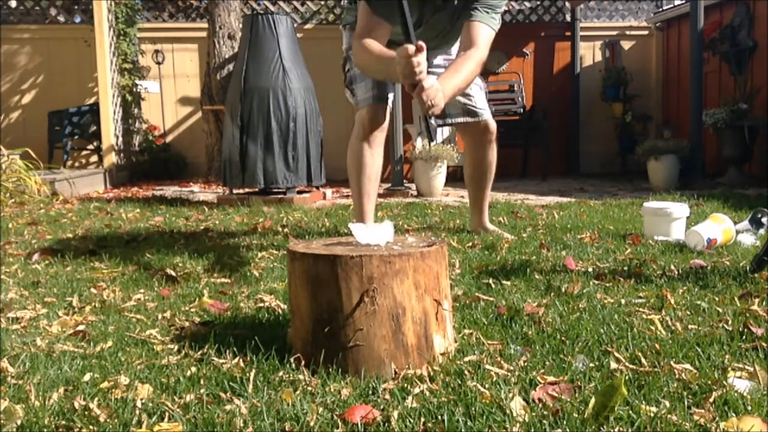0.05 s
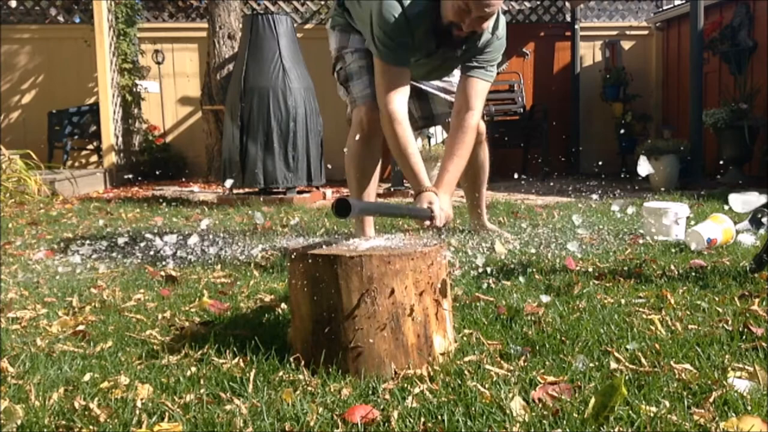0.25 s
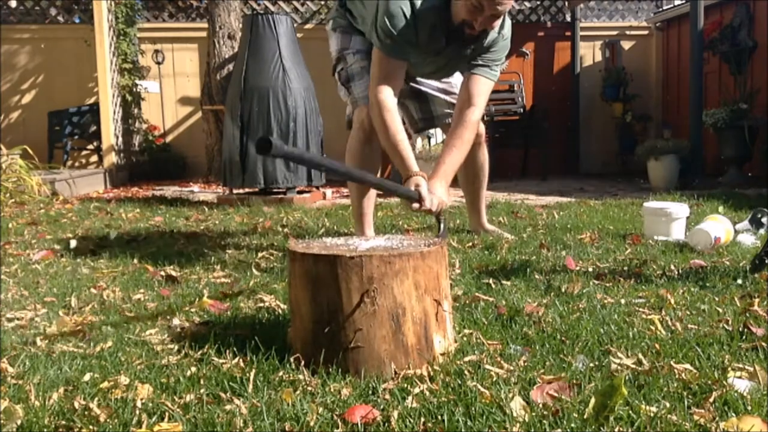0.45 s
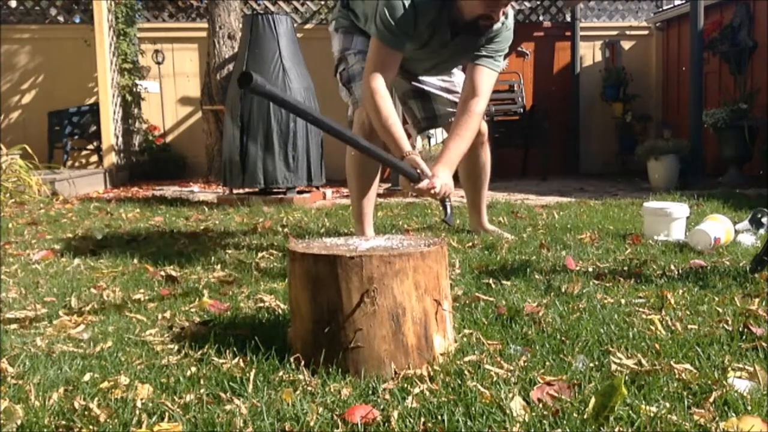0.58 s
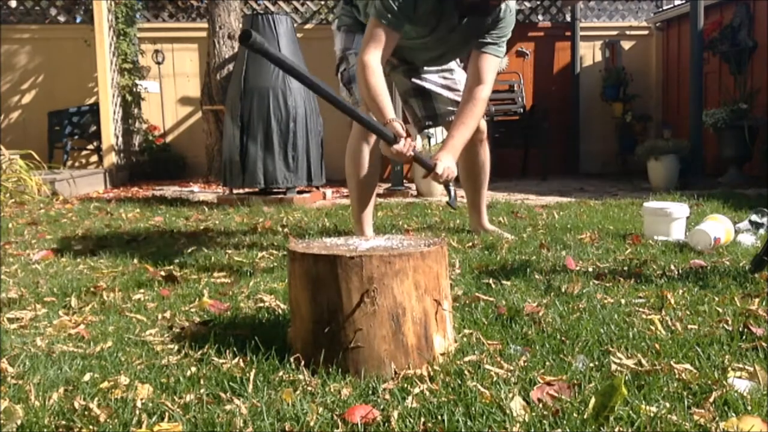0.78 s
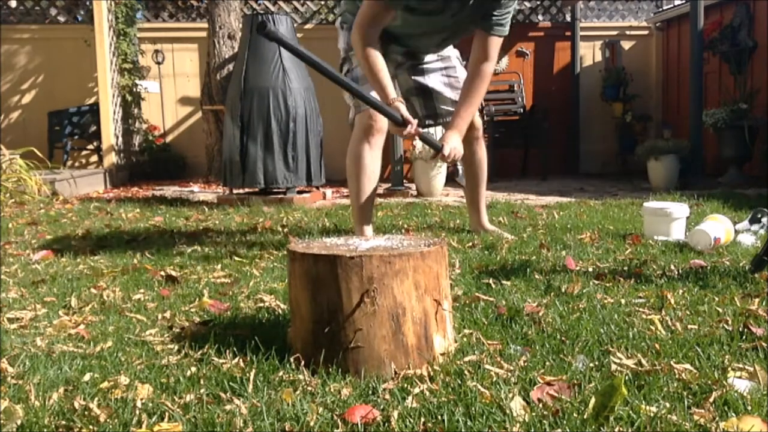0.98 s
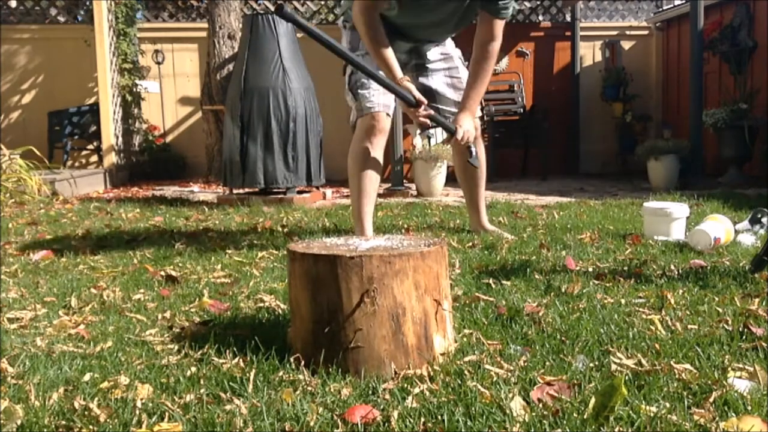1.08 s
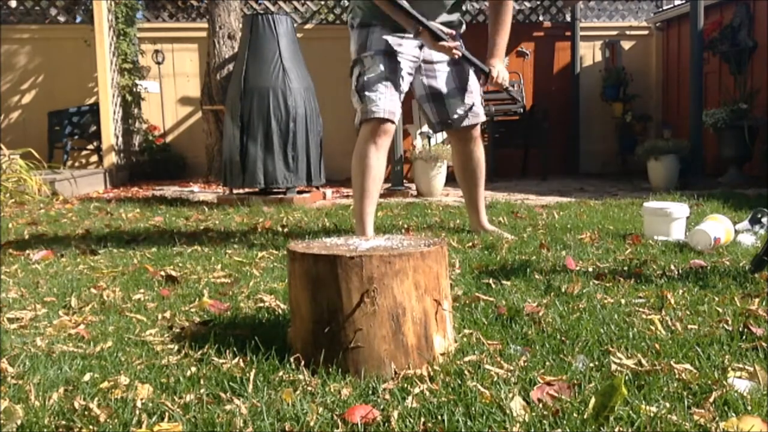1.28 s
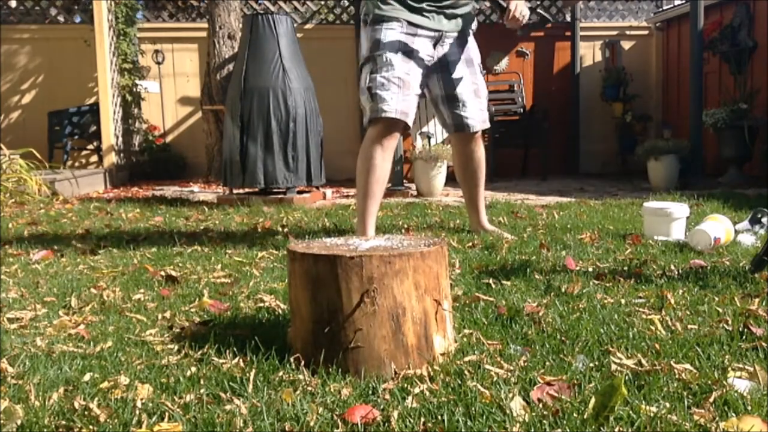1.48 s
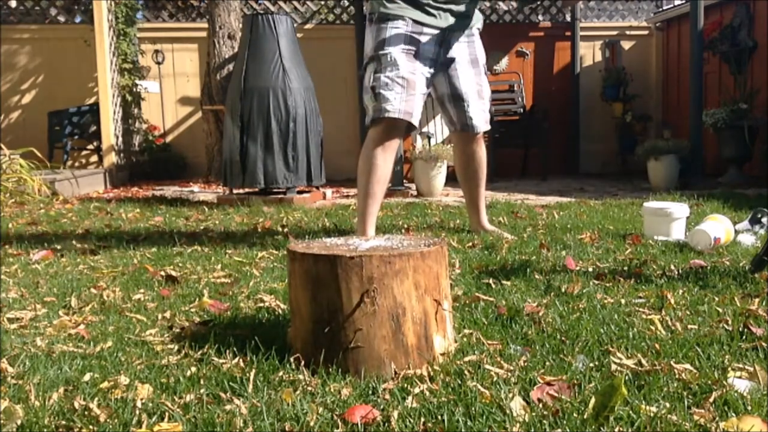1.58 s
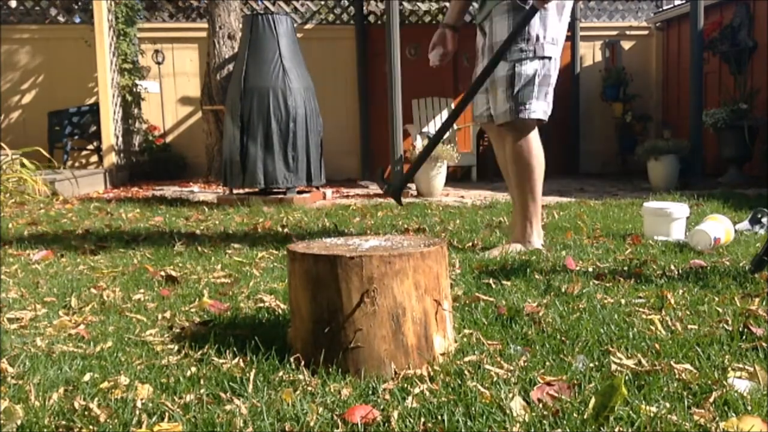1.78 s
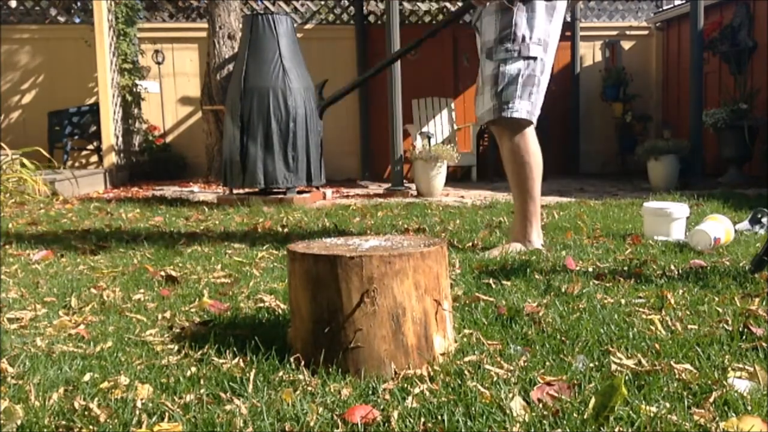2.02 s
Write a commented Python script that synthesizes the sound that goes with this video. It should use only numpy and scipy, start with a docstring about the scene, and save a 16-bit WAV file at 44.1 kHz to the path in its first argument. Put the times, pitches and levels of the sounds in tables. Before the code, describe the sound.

A piece of crockery shatters under a cane blow, followed by briefly clinking falling fragments.

```python
"""In a fenced backyard, a cane smashes a piece of crockery on a wooden stump.
Brittle fracture gives a few quick cracks over the thud of the stump's damped modes. A fifth of a second
later the shards land and vibrate freely, clinking and knocking on wood in a thinning shower of chips.
Fences and walls reflect the impacts. A distant engine drones, and a foot brushes the grass.
Near the end the sound drops out for a moment."""
import sys
import numpy as np
from scipy import signal
from scipy.fft import rfft, irfft
from scipy.io import wavfile
from scipy.ndimage import uniform_filter1d

SR = 44100
rng = np.random.default_rng(int(sys.argv[2]) if len(sys.argv) > 2 else 0)


def unload_audio(sound):
    """Save the sound as a 16-bit wav file, at the path given as the first command line argument."""
    columns = np.transpose(np.atleast_2d(sound))
    # keep every value between -1 and 1, then stretch to whole-number steps
    steps = np.round(np.clip(columns, -1, 1) * 32767)
    wavfile.write(sys.argv[1], SR, steps.astype(np.int16))


N = 90404
T = np.arange(N) / SR
LOG_FREQS = np.log(np.maximum(np.fft.rfftfreq(N, 1 / SR), 1))


def undb(db):
    """Amplitude ratio of a level in decibels."""
    return 10 ** (np.asarray(db) / 20)


def unit(x):
    """Normalisation to an rms of 1."""
    return x / np.sqrt(np.mean(x ** 2))


def curve(rows):
    """Amplitude envelope interpolated between (seconds, dB) points."""
    return undb(np.interp(T, *np.array(rows).T))


def colour(x, points):
    """Spectral shaping of x by (Hz, dB) points, at an rms of 1."""
    hz, db = np.array(points).T
    gain = undb(np.interp(LOG_FREQS, np.log(hz), db))
    return unit(irfft(rfft(x) * gain, N))


def noise(points):
    """Gaussian noise with a shaped spectrum."""
    return colour(rng.standard_normal(N), points)


def decay(start, t60):
    """Exponential damping: an instant onset, then a fall of 60 dB every t60 seconds."""
    return (T >= start) * np.exp(-np.log(1000) * np.maximum(T - start, 0) / t60)


def ring(start, modes, contact_s=.0005):
    """Modal superposition: damped sinusoids that build up over the contact time."""
    push = np.clip((T - start) / contact_s, 0, 1)
    return push * sum(undb(db) * decay(start, t60) * np.cos(2 * np.pi * hz * (T - start))
                      for hz, db, t60 in modes)


def drift(rate_hz):
    """Smoothed random fluctuation with an rms of 1."""
    hold = int(SR / rate_hz)
    steps = np.repeat(rng.standard_normal(N // hold + 1), hold)
    return unit(uniform_filter1d(uniform_filter1d(steps, hold), hold)[:N])


def grains(per_s, points, kinds=8, spread_db=2, t60=0.01):
    """A Poisson process of uneven ticks; each kind of piece has its own short impulse response."""
    patter = 0
    for _ in range(kinds):
        sign = rng.choice([-1, 1], N)
        size = undb(spread_db * np.minimum(rng.exponential(size=N), 5))
        hits = rng.random(N) < per_s / kinds / SR
        response = rng.standard_normal(N) * decay(0, t60)
        patter = patter + signal.fftconvolve(hits * sign * size, response)[:N]
    return colour(patter, points)


# Cracks of the break. Each row: start in seconds, level in dB, t60 in seconds.
CRACKS = [(0.215, -15, 0.013), (0.2163, -9, 0.0089), (0.2177, -15.5, 0.025)]
# Spectrum of a crack. Each row: frequency in Hz, relative level in dB.
CRACK_SPECTRUM = [(40, -45.5), (110, -28), (250, -8), (550, -8), (1000, -1.5), (1700, 1), (2500, -6.5),
                  (4000, -7), (7000, -8), (10500, -11.5), (15000, -18.5)]
# Blows of the cane on the stump. Each row: start in seconds, level in dB.
BLOWS = [(.2161, -14), (.2185, -23)]
# Modes of the stump. Each row: frequency in Hz, relative level in dB, t60 in seconds.
STUMP_MODES = [(168, -13.5, .07), (216, -9.5, .08), (697, -6, 0.077), (1017, -1, .03), (1356, 2.5, .018),
               (1681, -0.5, 0.019), (2123, -24.5, .14), (2770, -21.5, 0.23), (3285, -11.5, 0.025),
               (3820, -14.5, 0.034), (4870, -6, 0.013), (7300, -14.5, 0.018)]

def smash(snap_s=.2163, snap_hz=1500, snap_db=-7.5):
    """Impact: the crockery fractures with one sharp pressure pulse and a few quick cracks, and the cane excites
    the stump."""
    u = 2 * np.pi * snap_hz * (T - snap_s)
    snap = undb(snap_db) * u * np.exp((1 - u ** 2) / 2)  # its spectrum peaks at snap_hz
    cracks = sum(undb(db) * noise(CRACK_SPECTRUM) * decay(start, t60) for start, db, t60 in CRACKS)
    thud = sum(undb(db) * ring(start, STUMP_MODES) for start, db in BLOWS)
    return snap + cracks + thud


# Modes of the big shard. Each row: frequency in Hz, relative level in dB, t60 in seconds.
SHARD_MODES = [(1350, -13, .05), (3027, -4, .1), (3101, -2, .07), (3206, -4, .03), (3260, 0, .15),
               (3635, -7, .03), (4037, -6, .03), (4364, -4, .03), (4497, -8, .035), (5733, -17, .1)]
# Landings of the big shard. Each row: start in seconds, level in dB.
LANDINGS = [(0.4138, -27.5), (0.4517, -25.5)]
# Modes of the boards. Each row: frequency in Hz, relative level in dB, t60 in seconds.
BOARD_MODES = [(300, -15.5, .06), (468.8, 1.5, .15), (539.7, 2, 0.047), (622.7, -1.5, 0.079),
               (1217, -3, 0.11), (1282, -6.5, 0.05), (1567, -10, 0.073), (2297, -4.5, .025)]
# Knocks on the boards. Each row: start in seconds, ring level in dB, crack level in dB.
KNOCKS = [(.4135, -53, -28.5), (0.4535, -34, -13.5)]
# Spectrum of a knock's crack. Each row: frequency in Hz, relative level in dB.
KNOCK_SPECTRUM = [(60, -50.5), (300, -13), (1500, -16), (4000, 8), (7000, -8), (10500, 1.5), (15000, -24.5)]

def big_shard():
    """A collision excites both bodies: a large piece clinks twice and the boards knock under it."""
    crack = noise(KNOCK_SPECTRUM)
    knocks = sum(undb(db) * ring(start, BOARD_MODES) + undb(crack_db) * crack * decay(start, t60=0.0073)
                 for start, db, crack_db in KNOCKS)
    clinks = sum(undb(db) * ring(start, SHARD_MODES) for start, db in LANDINGS)
    return knocks + clinks


# Chips landing. Each row: start in seconds, ring level in dB, frequency in Hz, t60 in seconds,
# tick level in dB.
CHIPS = [(0.3876, -35, 4570, 0.0094, -40.5), (.4133, -10, 8570, 0.023, -23.5),
         (.4845, -24, 8000, 0.0055, -35), (0.4892, -27, 6100, .008, -30), (0.5207, -24, 7200, 0.0071, -28),
         (.5423, -29, 11700, .007, -28), (0.5623, -19, 9000, 0.0052, -30),
         (.6238, -30.5, 9400, 0.0054, -30.5), (0.6425, -36, 7660, .008, -40),
         (0.6528, -35, 6270, 0.0092, -42), (.6813, -30.5, 6160, 0.006, -47),
         (0.692, -56, 8900, 0.0063, -47), (0.7267, -50, 7900, .008, -48), (.8, -47, 4540, 0.012, -51),
         (0.871, -63, 5480, 0.17, -68), (0.9169, -44, 9800, 0.006, -46)]
# Spectrum of a tick. Each row: frequency in Hz, relative level in dB.
TICK_SPECTRUM = [(60, -52), (300, -22), (2000, -13.5), (4500, -11.5), (8500, 0), (12000, -3), (15000, -8.5)]

def chips():
    """Small bodies have high natural frequencies: each chip lands with a tick and one high mode."""
    tick = noise(TICK_SPECTRUM)
    return sum(ring(start, [(hz, db, t60)]) + undb(tick_db) * tick * decay(start, t60=0.014)
               for start, db, hz, t60, tick_db in CHIPS)


# Modes of the far shard. Each row: frequency in Hz, relative level in dB, t60 in seconds.
FAR_SHARD_MODES = [(3203, -7, .1), (4107, -5, .1), (5380, 0, .14), (5545, 3, .19), (5720, 2, .26),
                   (8400, -7, .08), (9803, -9, .08)]
# Its bounces. Each row: start in seconds, level in dB.
FAR_BOUNCES = [(0.9519, -52.5), (.965, -69.5), (.989, -61)]

def far_shard():
    """Free vibration and friction: a piece thrown high lands late, ringing and scraping as it bounces."""
    scrape = undb(5) * noise([(1500, -29), (3500, 6.5), (5500, 4), (9500, 0), (15000, -10.5)])
    return sum(undb(db) * (ring(start, FAR_SHARD_MODES) + scrape * decay(start, t60=0.2))
               for start, db in FAR_BOUNCES)


# Spectrum of the flying splinters. Each row: frequency in Hz, relative level in dB.
SPRAY_SPECTRUM = [(50, -51), (200, -15), (600, -7), (1200, -1.5), (2500, 2), (4000, -0.5), (6500, -6),
                  (9000, -9), (15000, -14.5)]

def spray(start=.221, rise_s=0.0081, level_db=-31):
    """Fragmentation: splinters burst from the break in dense ticks that fade exponentially."""
    swell = np.clip((T - start) / rise_s, 0, 1) * decay(start, t60=0.34)
    return undb(level_db) * swell * grains(6000, SPRAY_SPECTRUM)


# Envelope of the falling splinters. Each row: time in seconds, relative level in dB.
SHOWER_LEVEL = [(.36, -70), (.398, -60), (.404, -42), (.45, -40), (.485, -36), (.6, -46), (.72, -53),
                (.8, -62), (.89, -70), (1.1, -88), (2.05, -120)]
# Their spectrum. Each row: frequency in Hz, relative level in dB.
SHOWER_SPECTRUM = [(60, -55), (300, -22.5), (1500, -15), (2600, -11.5), (4200, -5), (5000, -5.5),
                   (8000, -0.5), (11000, -4), (15000, -4.5)]

def shower(gain_db=2):
    """Incoherent summation: many tiny impacts on fence, leaves and grass merge into a patter."""
    return undb(gain_db) * curve(SHOWER_LEVEL) * grains(2600, SHOWER_SPECTRUM)


# Reverberation of the yard. Each row: band frequency in Hz, level in dB, t60 in seconds.
YARD_BANDS = [(198, -11, 0.45), (600, -14.5, 0.26), (1492, -16.5, 0.54), (3500, -16.5, 0.55),
              (6470, -11, 0.25), (8500, -20, .3), (14000, -17.5, 0.21)]

def yard(x, build_s=0.02):
    """Diffuse reflection: fences and walls add a short tail, each band decaying at its own rate."""
    hz, db, t60 = np.array(YARD_BANDS).T
    spectrum, tail = rfft(rng.standard_normal(N)), 0
    for share, gain, fall in zip(np.eye(len(hz)), undb(db), t60):
        band = irfft(spectrum * np.interp(LOG_FREQS, np.log(hz), share), N)
        envelope = decay(0, fall) * np.minimum(T / build_s, 1) ** 2
        tail = tail + gain * band * envelope / np.linalg.norm(envelope)
    return x + signal.fftconvolve(x, tail)[:N]


# Rustles. Each row: centre in seconds, Gaussian width in seconds, level in dB.
RUSTLES = [(0.1, 0.052, -84), (0.214, .018, -58.5), (1.866, 0.084, -63.5)]
# Their spectrum. Each row: frequency in Hz, relative level in dB.
RUSTLE_SPECTRUM = [(100, -29), (1000, 2.5), (4000, -1.5), (10000, 1.5), (15000, 0)]

def rustles():
    """Friction noise: clothes rub during the swing; later a bare foot brushes the grass."""
    swells = sum(undb(db) * np.exp(-.5 * ((T - centre) / width) ** 2) for centre, width, db in RUSTLES)
    return swells * grains(5000, RUSTLE_SPECTRUM)


# Engine harmonics in three groups. Each row: multiple of the firing rate, relative level in dB.
ENGINE_LOW = [(1, -11.5), (2, -1)]
ENGINE_MID = [(3, 0.5), (4, -12.5)]
ENGINE_HIGH = [(5, 1), (7, -3.5), (8, -6.5)]
# Envelopes of those groups. Each row: time in seconds, level in dB.
LOW_LEVEL = [(0, -57.5), (.3, -68), (.62, -58.5), (.85, -62.5), (1.2, -58), (1.7, -54), (2.05, -54.5)]
MID_LEVEL = [(0, -53.5), (.22, -51.5), (.4, -69.5), (.7, -64.5), (1, -55), (1.35, -49.5), (1.8, -53),
             (2.05, -43.5)]
HIGH_LEVEL = [(0, -72.5), (.7, -76), (1.3, -68), (1.5, -56), (1.7, -53), (1.82, -66.5), (2.05, -64.5)]

def engine(firing_hz=72.88):
    """Periodic firing gives a distant harmonic drone; each partial wavers in level and phase."""
    phase = 2 * np.pi * np.cumsum(firing_hz * (1 + .003 * drift(9))) / SR
    drone = 0
    for harmonics, level in (ENGINE_LOW, LOW_LEVEL), (ENGINE_MID, MID_LEVEL), (ENGINE_HIGH, HIGH_LEVEL):
        for multiple, db in harmonics:
            amplitude = curve(level) * undb(db + 1.8 * drift(16))
            offset = 2 * np.pi * rng.random() + 0.72 * drift(25)
            drone = drone + amplitude * np.sin(multiple * phase + offset)
    return drone


# Spectrum of the outdoor background. Each row: frequency in Hz, relative level in dB.
AMBIENT_SPECTRUM = [(25, -46.5), (50, -35), (75, -18.5), (110, -21.5), (150, -13.5), (190, -9), (270, -9),
                    (340, -15.5), (430, -20), (600, -12), (950, -12), (1500, -14.5), (2000, -20),
                    (3500, -28.5), (5600, -40.5), (9000, -45), (15000, -50)]
# Its envelope. Each row: time in seconds, level in dB.
AMBIENT_LEVEL = [(0, -51.5), (.2, -51), (.35, -59.5), (.75, -57), (1.1, -52.5), (1.7, -51.5), (2.05, -51.5)]

def neighbourhood():
    """Ambient noise: a low broadband wash whose level wavers slightly."""
    return noise(AMBIENT_SPECTRUM) * curve(AMBIENT_LEVEL) * undb(0.3 * drift(8))


def scene(low_cut_hz=175):
    """Superposition: impacts, their deep bass cut by the microphone, reverberate over the background."""
    debris = big_shard() + chips() + far_shard() + spray() + shower()
    high_pass = signal.butter(3, low_cut_hz, "high", fs=SR, output="sos")
    impacts = signal.sosfilt(high_pass, smash() + debris)
    return (yard(impacts) + engine() + neighbourhood() + rustles())[None]


def record(dry, gap_s=(1.719, 1.751), gap_db=-27.5, top_hz=15200):
    """Attenuation, clipping and band limiting: a brief dropout, a flattened peak and a cut top."""
    gap = np.where((T > gap_s[0]) & (T < gap_s[1]), undb(gap_db), 1)
    low_pass = signal.ellip(10, .2, 80, top_hz, fs=SR, output="sos")
    return signal.sosfilt(low_pass, np.clip(dry * gap, -1, 1))


dry = scene()
out = record(dry)
unload_audio(out)
```